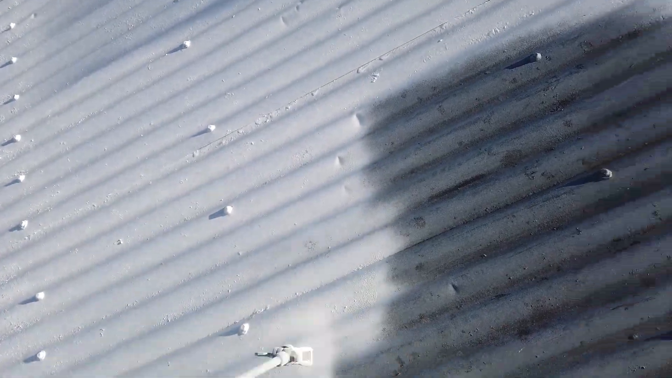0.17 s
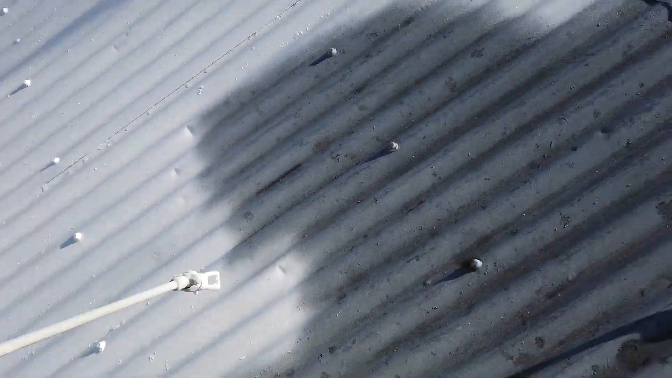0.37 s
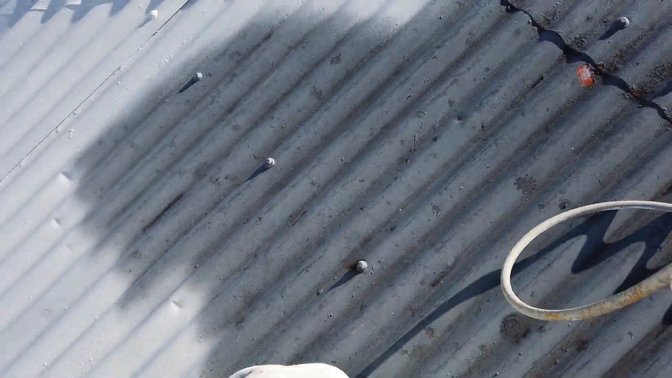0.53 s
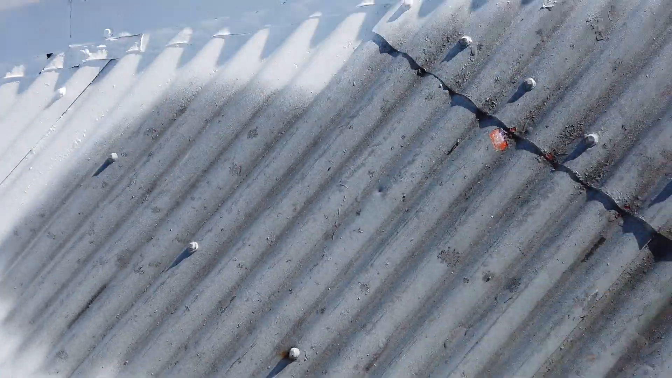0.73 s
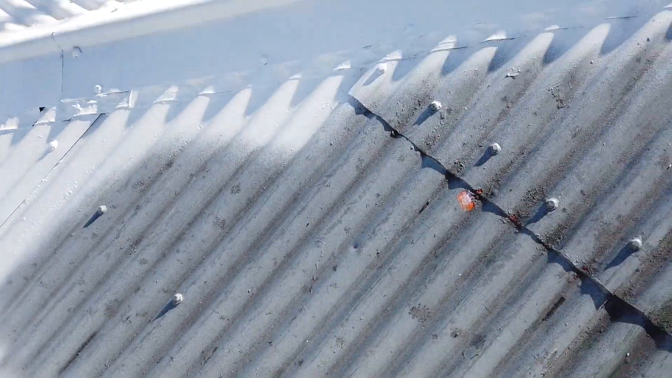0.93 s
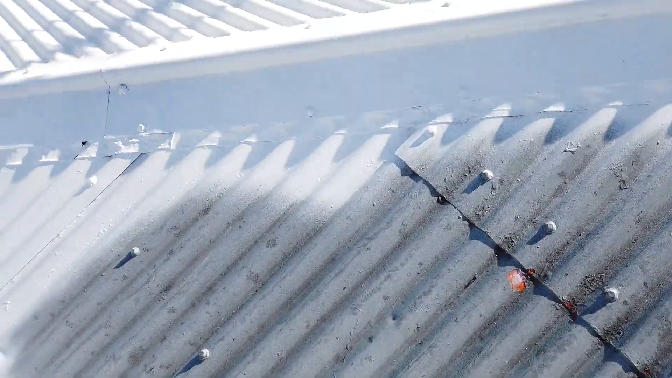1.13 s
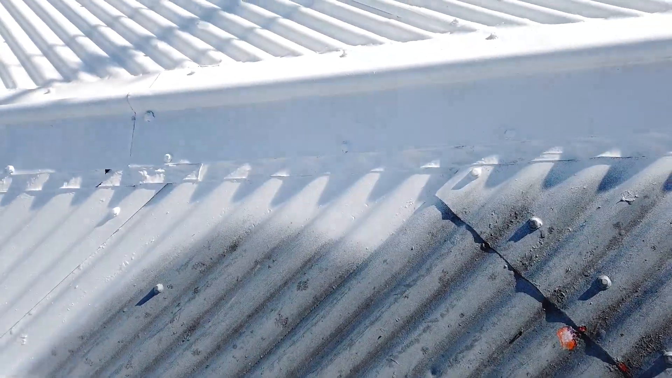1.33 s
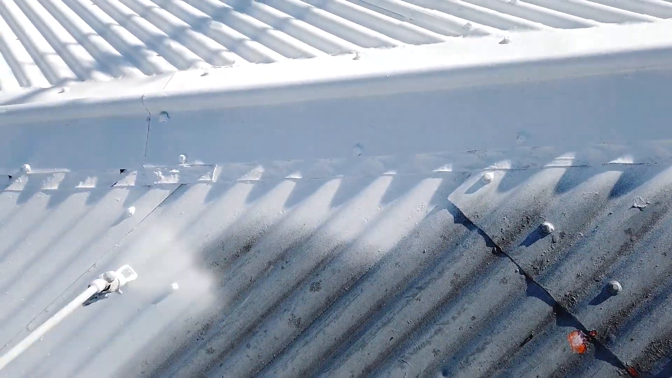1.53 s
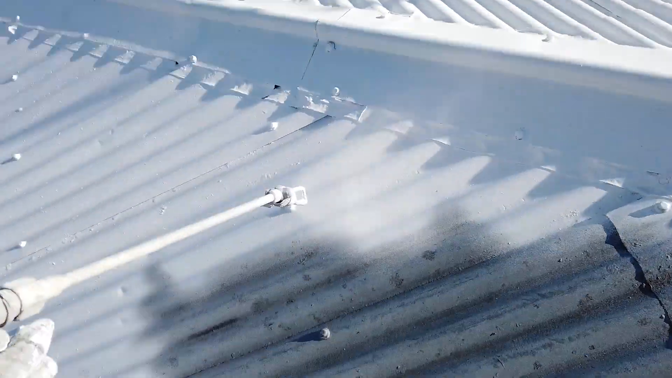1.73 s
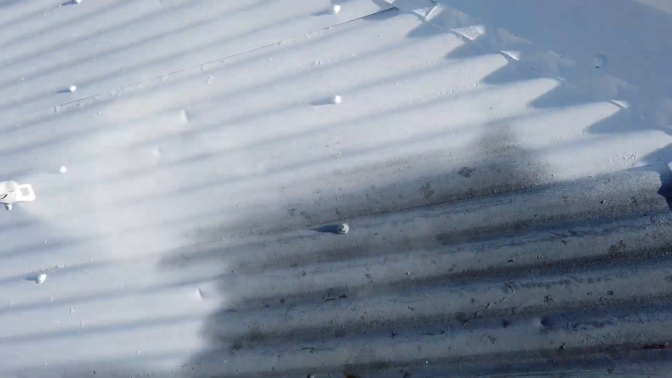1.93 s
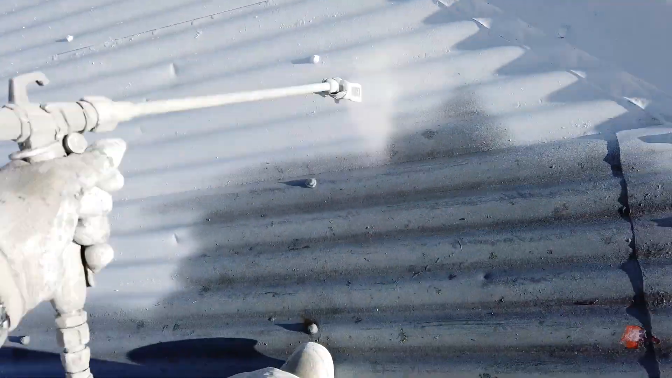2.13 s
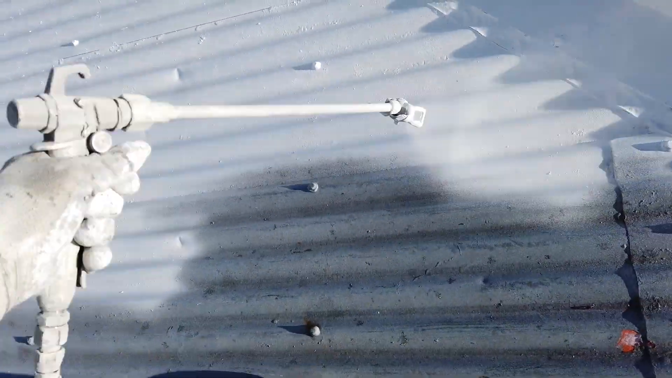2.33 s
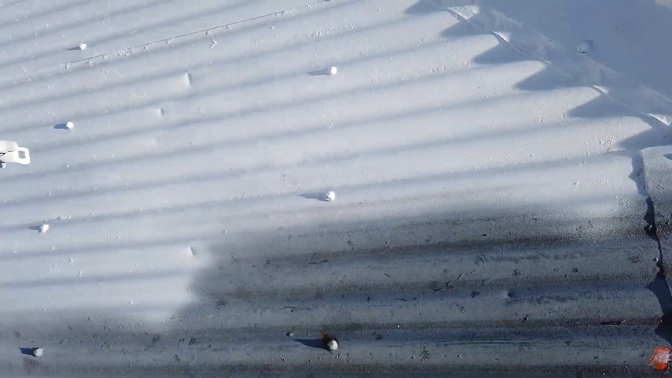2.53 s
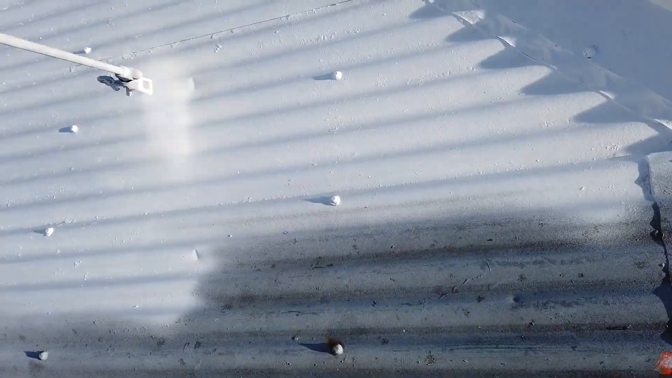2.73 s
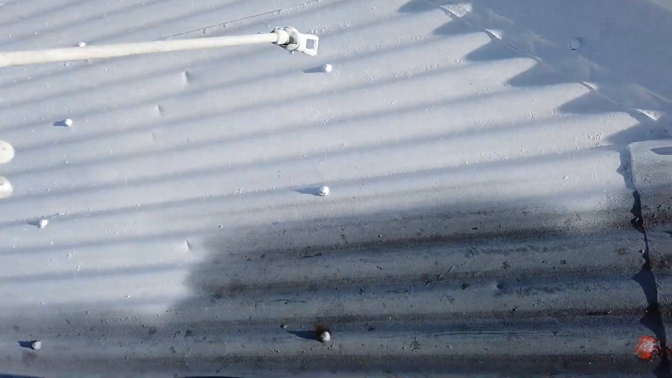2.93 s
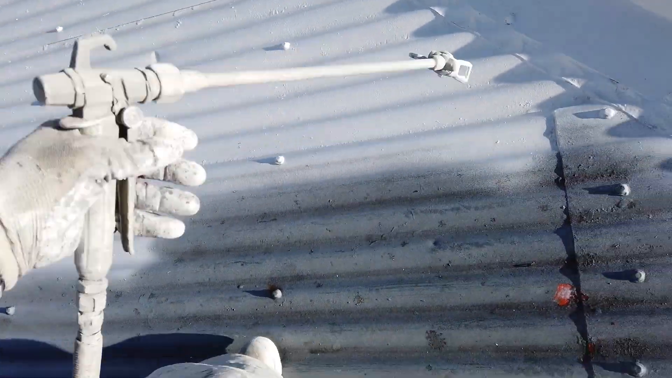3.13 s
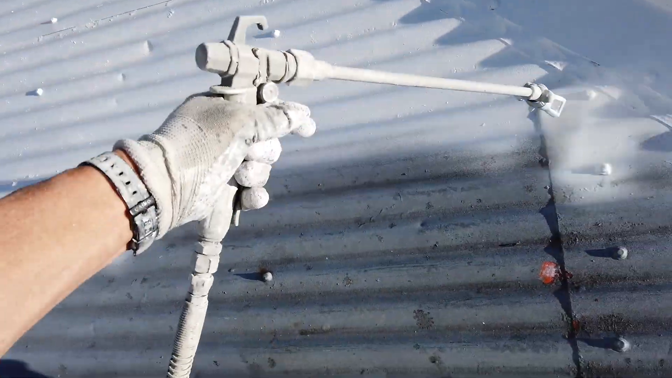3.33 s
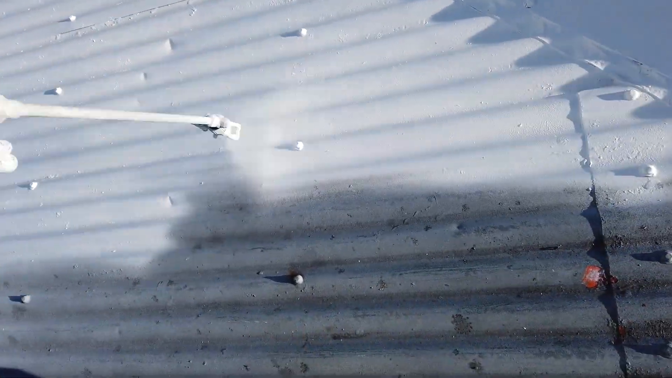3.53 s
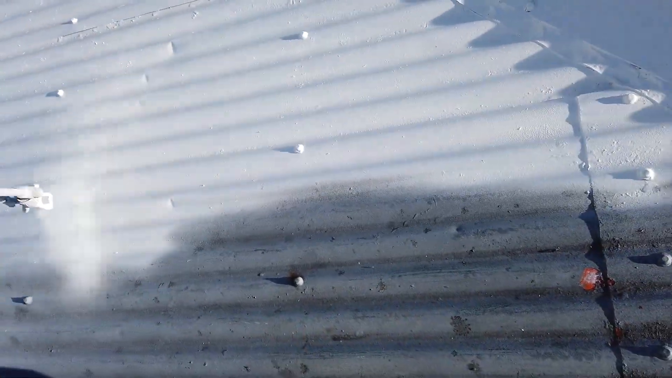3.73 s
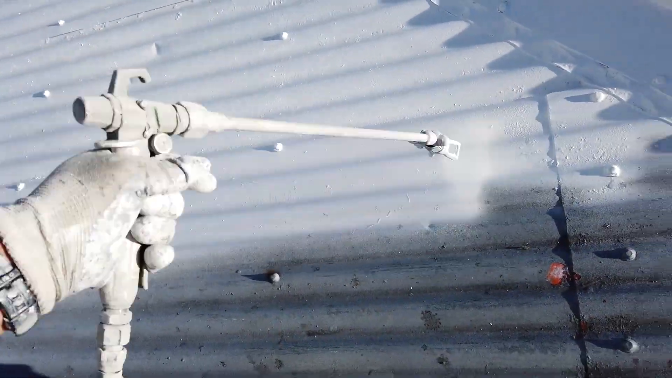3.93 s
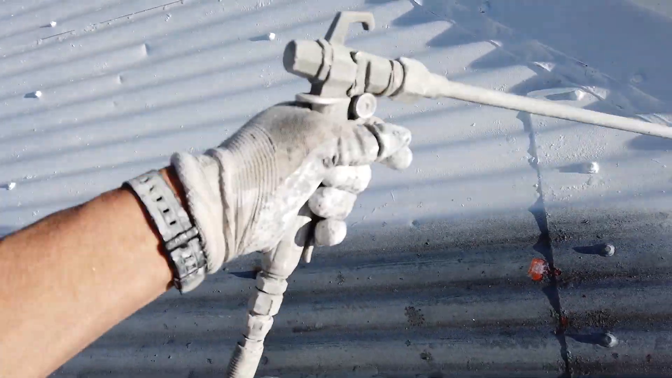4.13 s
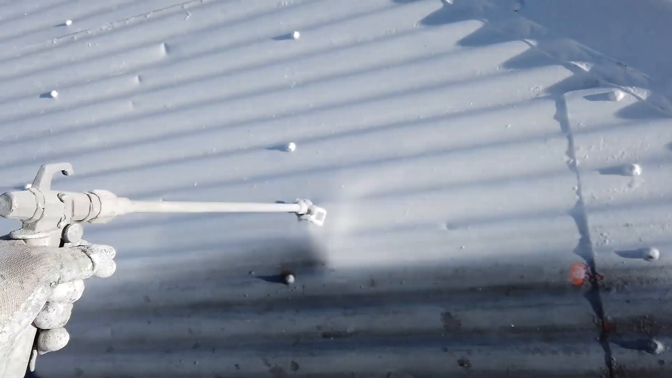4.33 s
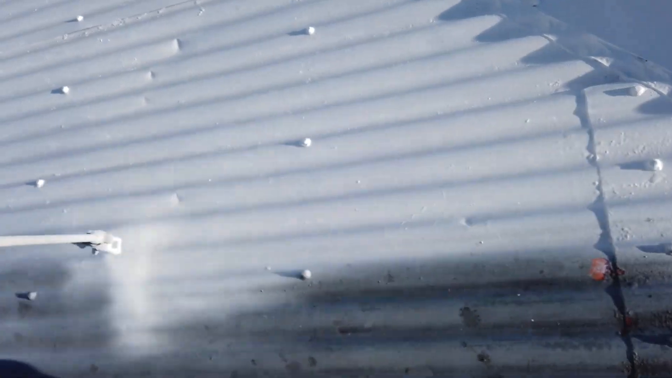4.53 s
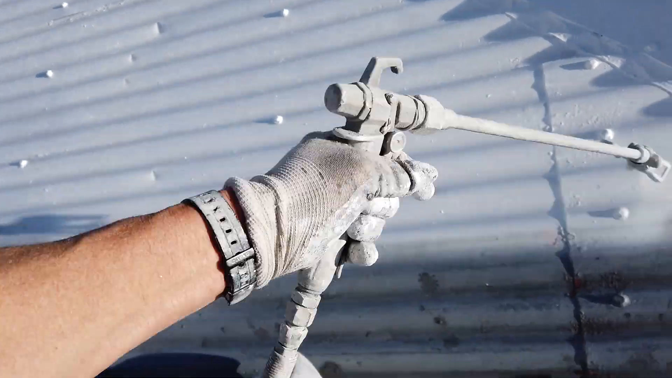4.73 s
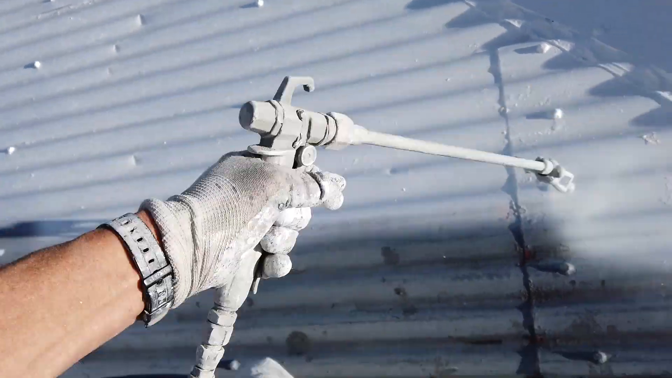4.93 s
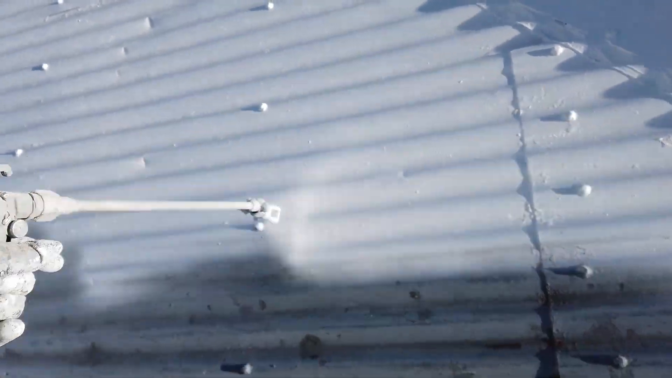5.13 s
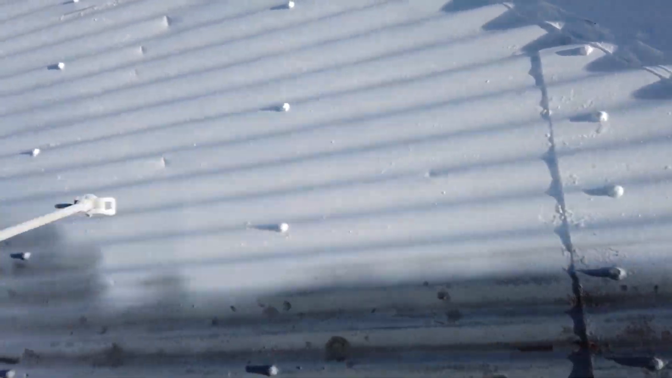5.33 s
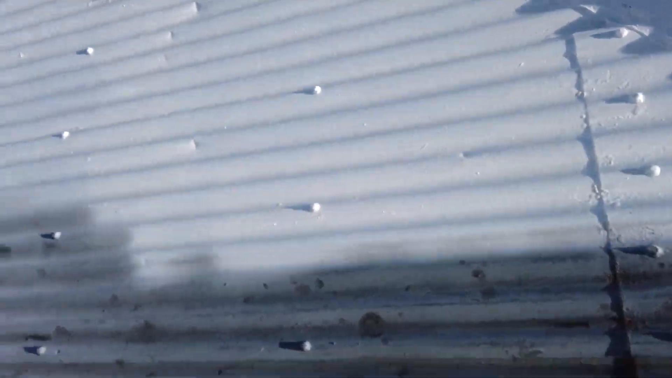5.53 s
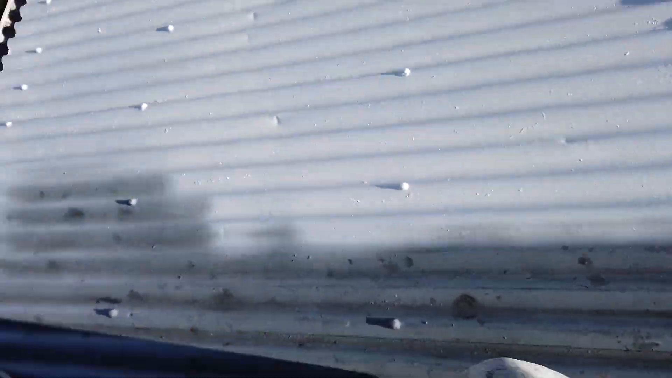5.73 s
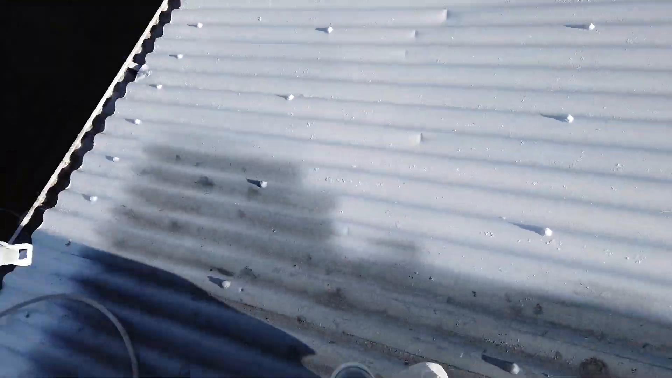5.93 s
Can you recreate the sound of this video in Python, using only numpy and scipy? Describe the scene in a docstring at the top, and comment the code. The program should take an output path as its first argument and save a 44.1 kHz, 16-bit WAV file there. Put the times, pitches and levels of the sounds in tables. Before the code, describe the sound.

A close stereo microphone outdoors catches a paint sprayer on a corrugated metal roof. From 0 seconds a bright, dense hiss with a softer rush is already running, stopping sharply near 0.36. Quiet air and light cloth and hose rustle follow from about 0.5. At 0.93 a shoe snaps the sheet and scrapes over grit; another scuff and firmer landing around 1.2 give a short, dull metallic ring and low thud. Spray returns from 1.47 to 2.59, shifting in level and brightness, then in a brief puff from 2.79 to 2.95. A tiny tick comes near 3.25. The longest burst runs from 3.38 to 5.39, with sputtering texture and small wind bumps. Barely audible hums and thin whines waver beneath. After spraying ends, gusts build; from 5.7 heavy low buffeting, raspy flaps and hollow pops hit hard, easing after 5.9 with a faint, fuzzy whistle.

```python
"""A paint spray hisses from the first instant, in four bursts onto a corrugated metal roof.
Tip hiss and the rush of the fan are shaped noise; their level and colour change as the wand sweeps.
Between bursts cloth and hose rustle, and a shoe scuffs, lands and rings the sheet's damped modes.
Faint tones waver beneath. Wind noise buffets each microphone, hardest at the end, with pops and a whistle."""
import sys
import numpy as np
from scipy import signal
from scipy.fft import rfft, irfft
from scipy.io import wavfile
from scipy.ndimage import uniform_filter1d

SR = 44100
rng = np.random.default_rng(int(sys.argv[2]) if len(sys.argv) > 2 else 0)


def wrap_up_sound(samples):
    """Save the sound to the file named by the first command line argument, as 16-bit audio."""
    columns = np.atleast_2d(samples).T
    # keep every value between -1 and 1, then stretch to whole-number steps
    tamed = np.clip(columns, -1, 1)
    steps = np.round(tamed * 32767).astype(np.int16)
    wavfile.write(sys.argv[1], SR, steps)


N = 268128
T = np.arange(N) / SR
# short-time grid of the spray: 512-sample windows, 128-sample hop
WINDOW, HOP = 512, 128
BINS = np.fft.rfftfreq(WINDOW, 1 / SR)
FRAMES = np.arange(N // HOP + 5) * HOP / SR


def amp(db):
    """Decibels to gain."""
    return 10 ** (np.asarray(db) / 20)


def unit(x):
    """Scales to rms 1."""
    return x / np.sqrt(np.mean(x ** 2) + 1e-20)


def read(points, hz):
    """Interpolates a spectrum table on a log-frequency axis."""
    f, value = np.transpose(points)
    return np.interp(np.log(hz + 1), np.log(f), value)


def follow(rows, t):
    """Interpolates each column of a curve table at the times t."""
    s, *columns = np.transpose(rows)
    return [np.interp(t, s, c) for c in columns]


def noise(spectrum, alike=0.0):
    """Two channels of coloured noise, rms 1, that share the fraction alike of their power."""
    z = rng.standard_normal((3, N))
    share = np.clip(alike, 0, 1)
    pair = np.sqrt(1 - share) * z[:2] + np.sqrt(share) * z[2]
    gain = amp(read(spectrum, np.fft.rfftfreq(N, 1 / SR)))
    return unit(irfft(rfft(pair) * gain, N))


def wander(rate_hz):
    """Smooth random signal of rms 1 for each channel, low-passed at rate_hz."""
    hz = np.fft.rfftfreq(N, 1 / SR)
    lowpass = 1 / (1 + (hz / rate_hz) ** 4)
    return unit(irfft(rfft(rng.standard_normal((2, N))) * lowpass, N))


def hump(hz, width_hz):
    """A bell of height 1 over frequency."""
    return np.exp(-((BINS - hz) / width_hz) ** 2 / 2)


def port_turns(count, spread_turns=0.45):
    """A random phase in turns for each vibration, a little apart at the two microphones."""
    z = rng.random((count, 3, 1))
    return z[:, :1] + spread_turns * z[:, 1:]


def ring(modes, hz=None):
    """A soft blow on damped modes, peak 1; hz retunes the first mode and scales the rest alike."""
    contact_s = 0.0018
    t = T[:SR // 4]
    turns = port_turns(count=len(modes))
    stretch = hz / modes[0][0] if hz else 1
    waves = 0
    for (f, db, t60_s), p in zip(modes, turns):
        decay = amp(db - 60 * t / t60_s)
        waves = waves + decay * np.sin(2 * np.pi * (stretch * f * t + p))
    waves = waves * (1 - np.exp(-(t / contact_s) ** 2))
    return waves / abs(waves).max(axis=1, keepdims=True)


def add(mix, s, sound):
    """Mixes a sound in at time s, cut at the end of the mix."""
    part = mix[:, round(s * SR):][:, :sound.shape[1]]
    part += sound[:, :part.shape[1]]


def valve(close_db_per_s=2100):
    """The needle valve snaps open; on release the jet dies within a few hundredths of a second."""
    open_s = 0.0022
    # Each row is a trigger pull: valve opens in seconds, starts to close in seconds.
    trigger = [(-0.05, 0.36), (1.472, 2.593), (2.787, 2.953), (3.376, 5.394)]
    gain = 0
    for on, off in trigger:
        opening = (1 + np.tanh((T - on) / open_s)) / 2
        gain = gain + opening * amp(-close_db_per_s * np.maximum(T - off, 0))
    return gain


def patches():
    """Bright and dull spots in dB that drift through the hiss, plus a fixed ripple over frequency."""
    drift_db, ripple_db = 1.6, 0.6
    z = rng.standard_normal((len(FRAMES), len(BINS)))
    for _ in range(2):
        z = uniform_filter1d(z, size=19, axis=0)
        z = uniform_filter1d(z, size=5, axis=1)
    return drift_db * unit(z) + ripple_db * rng.standard_normal(len(BINS))


def spray(peak_width_hz=850):
    """Paint tears into mist at the tip and the fan rushes on the sheet; both vary as the wand sweeps."""
    # Wand sweep, one table a burst. Each row: time in seconds, tip hiss in dB, fan rush in dB.
    sweeps = [
        [(0.0, -34, -47), (0.058, -38, -46.5), (0.262, -29.5, -44.5), (0.304, -29, -41.5), (0.355, -27.5, -45)],
        [(1.485, -29, -43), (1.687, -30, -44), (1.741, -29, -44), (1.785, -28.5, -39.5), (1.861, -28, -43.5),
         (2.049, -34, -43.5), (2.073, -32, -46), (2.267, -28, -41), (2.383, -30, -45), (2.417, -27, -41.5),
         (2.493, -28, -45), (2.588, -33, -42.5)],
        [(2.8, -34.5, -43.5), (2.854, -27.5, -42.5), (2.948, -29.5, -44)],
        [(3.39, -28, -41), (3.434, -24.5, -39.5), (3.488, -27, -41), (3.61, -29, -43.5), (3.816, -36.5, -47.5),
         (3.854, -34, -44.5), (3.922, -31.5, -46.5), (3.932, -27, -43), (4.066, -27.5, -40.5),
         (4.126, -30, -43.5), (4.176, -29.5, -41), (4.292, -28, -43), (4.326, -27, -40.5), (4.57, -34.5, -47.5),
         (4.652, -32.5, -44), (4.73, -26.5, -45.5), (4.814, -29.5, -42), (4.874, -28, -44), (4.952, -30, -42),
         (4.974, -27.5, -40.5), (5.224, -31, -45), (5.38, -31.5, -45)],
    ]
    # Brightest part of the hiss. Each row: time in seconds, peak height in dB, its pitch in Hz.
    beam = [(0.0, 1, 11700), (0.12, 5, 11400), (0.29, -1, 11350), (0.35, 3.5, 11400), (1.5, 4, 11500),
            (1.62, -0.5, 10600), (1.75, 4, 11000), (1.9, 4.5, 11700), (1.97, 1, 10800), (2.07, 5, 11800),
            (2.2, 3, 11900), (2.29, 3.5, 10700), (2.38, 4, 12100), (2.46, 2.5, 10900), (2.585, 2, 11500),
            (2.8, 4.5, 11100), (2.92, 4.5, 10900), (3.39, -2, 12100), (3.46, 8, 11800), (3.53, 0, 10870),
            (3.6, 4.5, 10400), (3.68, 2, 11800), (3.8, 3, 11400), (3.89, 0, 12400), (3.945, 2, 12000),
            (4.0, 7, 11000), (4.08, 9, 11000), (4.14, -1, 11500), (4.21, 4, 13000), (4.33, 3, 12900),
            (4.46, 1.5, 11600), (4.53, 0.5, 10200), (4.63, 1, 10100), (4.69, 5, 10400), (4.745, 8, 10000),
            (4.82, -1, 10300), (5.0, 3.5, 11000), (5.12, 2, 10800), (5.22, 4, 10100), (5.385, 3, 10700)]
    # Colour as the fan turns. Each row: time in seconds, lower shoulder in dB, top treble in dB.
    colour_curve = [(0.1, 2, -1), (0.33, 1.5, -0.5), (1.52, 0, 3), (1.65, -3, -1.5), (1.8, 2.5, -1),
                    (1.95, 2.5, -4), (2.1, 3, -5), (2.2, 6, -1), (2.3, 1, -0.5), (2.55, 1.5, 1),
                    (2.9, 0.5, 1.5), (3.4, 0.5, -5), (3.58, -5, -2), (3.72, -4, -4), (3.83, 1, -0.5),
                    (4.02, -1, -3), (4.22, 0.5, 1.5), (4.34, 4, 0.5), (4.43, 1, -2), (4.58, -0.5, 0.5),
                    (4.74, 0, 2.5), (4.88, -2.5, -2.5), (5.03, 1, 0.5), (5.25, 1, 5), (5.38, 0.5, 0)]
    # Spectra of tip hiss and fan rush. Each row: frequency in Hz, relative density in dB.
    tip_spectrum = [(4500, -38), (6300, -21.5), (7200, -9), (8400, -5), (9200, -6.5), (10400, -3.5),
                    (11400, -2.5), (12600, -2.5), (14000, -6), (15700, -10)]
    fan_spectrum = [(300, -19), (1200, -22.5), (1700, -15.5), (2300, -8.5), (3200, -4.5), (4300, -3.5),
                    (5200, 1), (6000, 0.5), (6800, 1.5), (7700, -4), (11000, -16.5)]
    shoulder_hz, top_hz = 7910, 14850
    flutter_db, flutter_hz, sputter_db, sputter_hz = 0.3, 70, 0.95, 280

    hiss_db, rush_db = (c[:, None] for c in follow(np.vstack(sweeps), FRAMES))
    peak_db, bright_hz = (c[:, None] for c in follow(beam, FRAMES))
    shoulder_db, top_db = (c[:, None] for c in follow(colour_curve, FRAMES))
    # the jet beams its treble, so the brightest pitch moves as the wand turns
    beam_db = peak_db * hump(bright_hz, peak_width_hz)
    beam_db = beam_db + shoulder_db * hump(shoulder_hz, width_hz=600) + top_db * hump(top_hz, width_hz=1400)
    tip = amp(read(tip_spectrum, BINS) + beam_db)
    # colour alone must not change the level
    tip = tip / np.sqrt(np.mean(tip ** 2, axis=1, keepdims=True)) * amp(hiss_db)
    fan = unit(amp(read(fan_spectrum, BINS))) * amp(rush_db)
    colour = np.hypot(tip, fan) * amp(patches())

    white = np.sqrt(2) * rng.standard_normal((2, N + 1024))
    z = signal.stft(white, nperseg=WINDOW, noverlap=WINDOW - HOP)[2][:, :, :len(FRAMES)]
    hiss = signal.istft(z * colour.T, nperseg=WINDOW, noverlap=WINDOW - HOP)[1][:, :N]
    flutter = flutter_db * wander(rate_hz=flutter_hz)[0]
    sputter = sputter_db * wander(rate_hz=sputter_hz)[0]
    return hiss * amp(flutter + sputter) * valve()


def air():
    """Quiet of the open air: coloured noise, nearly independent at each microphone, wandering slowly."""
    # Each row: frequency in Hz, relative density in dB.
    outdoors = [(15, -15), (40, 1.5), (90, -11.5), (260, -11), (550, -27), (1000, -27.5), (2000, -29),
                (3200, -35.5), (5000, -41.5), (6800, -51), (8300, -44.5), (9200, -51.5), (12500, -45),
                (15500, -78.5)]
    return amp(-53.5) * noise(outdoors, alike=0.02) * amp(1.0 * wander(rate_hz=4.2)[0])


def wind_strength():
    """Buffeting and fast-eddy levels in dB: over the breeze each gust rises fast, holds and dies away."""
    # Breeze between gusts. Each row: time in seconds, level in dB.
    breeze = [(0.4, -56), (0.9, -43), (1.35, -49), (1.65, -57.5), (3.2, -57.5), (4.1, -64.5), (5.0, -51),
              (5.65, -47.5)]
    # Each row: start in seconds, hold in seconds, low buffeting in dB, fast eddies in dB.
    gusts = [(0.162, 0.028, -44, -55), (2.343, 0.03, -45, -76), (3.3, 0.079, -45.5, -64.5),
             (3.397, 0.056, -38.5, -48.5), (3.467, 0.013, -52, -46), (3.524, 0.043, -40, -49.5),
             (3.622, 0.086, -47.5, -60), (4.246, 0.073, -40, -49.5), (4.349, 0.14, -39.5, -54.5),
             (4.788, 0.1, -35.5, -50.5), (4.821, 0.025, -49, -39), (4.941, 0.0075, -34, -54),
             (5.063, 0.053, -34.5, -56), (5.255, 0.047, -46.5, -54), (5.4, 0.043, -39, -74.5),
             (5.544, 0.024, -34.5, -50.5), (5.694, 0.033, -33, -43.5), (5.738, 0.013, -21.5, -30),
             (5.757, 0.066, -20.5, -39), (5.775, 0.014, -25.5, -29.5), (5.815, 0.011, -19.5, -22.5),
             (5.838, 0.035, -17.5, -28), (5.868, 0.011, -23.5, -21.5), (5.891, 0.016, -18.5, -28.5),
             (5.943, 0.15, -28, -49.5)]
    rise_s, buffet_fall_db_per_s, eddy_fall_db_per_s = 0.004, 336.5, 618
    breeze_eddy_db = -10  # relative to the breeze
    breeze_db = follow(breeze, T)[0]
    buffet, eddies = amp(breeze_db), amp(breeze_db + breeze_eddy_db)
    for s, hold_s, buffet_db, eddy_db in gusts:
        rise = (1 + np.tanh((T - s) / rise_s)) / 2
        past_s = np.maximum(T - s - hold_s, 0)
        buffet = np.hypot(buffet, rise * amp(buffet_db - buffet_fall_db_per_s * past_s))
        eddies = np.hypot(eddies, rise * amp(eddy_db - eddy_fall_db_per_s * past_s))
    return 20 * np.log10([buffet, eddies])


def wind(lumpy_db=1.5, burst_db=4.0, rasp_growth=1.13, rasp_db=-3.5):
    """Eddies push on each microphone apart; the fast ones come in short bursts and rasp when strong."""
    # Spectra of buffeting, fast eddies and rasp. Each row: frequency in Hz, relative density in dB.
    buffet_spectrum = [(15, -13.5), (32, 7), (58, 0.5), (110, -1.5), (195, -5.5), (280, -11.5), (500, -34),
                       (1000, -55), (3000, -74.5)]
    eddy_spectrum = [(60, -11.5), (200, -1), (440, 0.5), (620, -5), (900, -18.5), (1500, -26.5),
                     (3000, -58), (6000, -87)]
    rasp_spectrum = [(300, -14), (700, 5.5), (1200, 2.5), (1650, -5), (2400, -14), (3200, -29.5),
                     (4500, -41.5), (7000, -61)]
    churn_hz = 120
    buffet_db, eddy_db = wind_strength()
    lumps = wander(rate_hz=churn_hz)
    bursts = amp(burst_db * lumps)
    low = unit(noise(buffet_spectrum, alike=0.15) * amp(lumpy_db * lumps)) * amp(buffet_db)
    eddies = unit(noise(eddy_spectrum, alike=0.07) * bursts) * amp(eddy_db)
    rasp = unit(noise(rasp_spectrum, alike=0.11) * bursts) * amp(rasp_growth * eddy_db + rasp_db)
    return low + eddies + rasp


def rustles():
    """Sleeve and hose rub as the painter moves: soft swells of grainy noise."""
    # Each row: middle in seconds, length in seconds, level in dB.
    moves = [(0.558, 0.035, -57), (0.63, 0.069, -61.5), (0.713, 0.053, -67), (0.824, 0.12, -69),
             (0.991, 0.04, -54.5)]
    # Each row: frequency in Hz, relative density in dB.
    rub_spectrum = [(500, -22), (1600, 3), (4000, -5), (7000, -15), (11000, -6.5), (15500, -15)]
    grain_db = 2.0
    swell = sum(amp(db) * np.exp(-(2 * (T - s) / length_s) ** 2) for s, length_s, db in moves)
    return swell * noise(rub_spectrum) * amp(grain_db * wander(rate_hz=200))


def steps(spread_db=-4, spread_t60_s=0.21):
    """The sole scrapes over grit; the sheet rings dully, flexes and snaps; faint ticks come late."""
    # Scrapes. Each row: start in seconds, hold in seconds, level in dB.
    scuffs = [(0.929, 0.017, -35.5), (0.957, 0.017, -36), (0.984, 0.018, -43.5), (1.003, 0.0071, -40.5),
              (1.032, 0.0079, -45.5), (1.05, 0.063, -59.5), (1.172, 0.02, -35), (1.202, 0.022, -48)]
    # Each row: time in seconds, sheet ring in dB, its pitch in Hz, low thud in dB.
    footfalls = [(0.982, -30.5, 524, -37), (1.005, -31, 330, -24), (1.042, -34, 326, -40),
                 (1.103, -41, 285, -29.5), (1.174, -28.5, 660, -48.5), (1.18, -35, 784, -48),
                 (1.187, -28, 457, -27), (1.203, -20.5, 407, -28), (1.215, -34, 340, -22),
                 (1.231, -37, 326, -32), (1.246, -44, 299, -39), (3.028, -45.5, 270, -37)]
    # Snaps of the sheet under the shoe, and faint late ticks, perhaps the trigger.
    # Each row: time in seconds, main pitch in Hz, level in dB.
    snaps = [(0.9277, 1547, -20.5), (0.961, 1960, -35.5), (0.972, 2140, -38), (0.983, 1130, -38),
             (1.009, 1610, -32.5), (1.036, 1290, -43), (1.175, 1380, -35), (1.182, 1640, -34.5),
             (1.206, 1290, -41), (1.218, 1405, -44), (2.99, 2280, -62), (3.247, 2300, -55.5)]
    # Modes of shoe-damped sheet, flexing roof and snap. Each row: pitch in Hz, relative dB, t60 in seconds.
    sheet_modes = [(416, 14.5, 0.026), (319, 3.5, 0.077), (513, 4, 0.035), (650, -7, 0.037),
                   (910, -13, 0.055), (1080, -10.5, 0.066)]
    flex_modes = [(60, 2, 0.072), (106.3, 0, 0.044), (137, -1.5, 0.03)]
    snap_modes = [(1548, 7, 0.026), (738, -19, 0.05), (1140, -10.5, 0.05), (2060, -9.5, 0.034),
                  (2700, -14.5, 0.04), (3060, -13, 0.03), (3485, -14, 0.036), (3850, -17, 0.03),
                  (5000, -12, 0.014), (6000, -7.5, 0.016), (6730, -16, 0.012), (8400, -17, 0.012)]
    # Each row: frequency in Hz, relative density in dB.
    scrape_spectrum = [(200, 4), (600, 9), (1100, 2.5), (1600, 2.5), (2300, -1), (3200, -10), (4500, -19.5),
                       (6000, -24), (9000, -32), (15000, -38)]
    scuff_rise_s, scuff_fall_db_per_s = 0.0027, 850
    grit_db, grit_hz = 2.5, 600

    out, pressure = np.zeros((2, N)), np.zeros(N)
    for s, hold_s, scrape_db in scuffs:
        age_s = np.maximum(T - s, 0)
        fall_db = scuff_fall_db_per_s * np.maximum(age_s - hold_s, 0)
        pressure += (1 - np.exp(-age_s / scuff_rise_s)) * amp(scrape_db - fall_db)
    for s, ring_db, hz, thud_db in footfalls:
        add(out, s, amp(ring_db) * ring(sheet_modes, hz) + amp(thud_db) * ring(flex_modes))
    for s, hz, db in snaps:
        add(out, s, amp(db) * ring(snap_modes, hz))
    grit = amp(grit_db * wander(rate_hz=grit_hz))
    out = out + pressure * unit(noise(scrape_spectrum, alike=0.25) * grit)
    # these sounds spread through the rest of the roof and die there, dull
    tail = noise([(100, -9), (450, -6.5), (1500, -6.5), (4000, -25.5)]) * amp(-60 * T / spread_t60_s)
    tail = tail[:, :SR // 2]
    tail = tail / abs(rfft(tail)).max()
    return out + amp(spread_db) * signal.oaconvolve(out, tail, axes=1)[:, :N]


def hum(fade_s=0.22, waver_hz=1.2):
    """Faint, wavering sines, probably the pump: low hums while paint flows, thin whines around pauses."""
    # Each row: start in seconds, end in seconds, pitch in Hz, level in dB before the fades.
    tones = [(1.4, 2.62, 230, -58.5), (2.546, 2.9, 2140, -75.5), (2.96, 3.3, 2165, -73),
             (3.596, 4.3, 226.7, -63)]
    waver = waver_hz * wander(rate_hz=6.3)[0]
    out = 0
    for on, off, hz, db in tones:
        fade = np.clip(np.minimum(T - on, off - T) / fade_s, 0, 1)
        out = out + amp(db) * fade * np.sin(2 * np.pi * np.cumsum(hz + waver) / SR)
    return out


def thumps(length_s=0.0028):
    """A hard eddy hits the microphone ports: a brief, hollow pop, a sine under a bell-shaped swell."""
    # Each row: middle in seconds, pitch in Hz, peak level in dB.
    pops = [(3.548, 441, -36.5), (4.258, 297, -46), (4.299, 170.4, -40), (4.411, 199, -35.5),
            (4.45, 190.8, -37), (4.822, 555, -34), (4.844, 480, -36), (4.954, 378, -37.5),
            (5.11, 450, -38.5), (5.506, 739, -45.5), (5.565, 108.7, -29), (5.703, 450, -33.5),
            (5.783, 210, -23), (5.803, 200.3, -20.5), (5.822, 229.8, -16), (5.853, 189.6, -14),
            (5.876, 520, -17), (5.88, 648, -31), (5.912, 900, -23)]
    phases = 2 * np.pi * port_turns(count=len(pops))
    out = 0
    for (s, hz, db), phase in zip(pops, phases):
        swell = amp(db) * np.exp(-((T - s) / length_s) ** 2)
        out = out + swell * np.sin(2 * np.pi * hz * T + phase)
    return out


def whistle():
    """The closing gusts sing on an edge: a gliding tone made fuzzy, in a skirt of hiss."""
    # Each row: time in seconds, pitch in Hz, level in dB.
    glide = [(5.8, 2200, -75), (5.9, 2300, -59), (5.93, 2550, -55), (5.95, 2350, -54), (5.968, 2850, -57),
             (5.987, 2780, -53), (6.012, 2300, -55), (6.04, 2330, -57), (6.08, 2050, -61)]
    core_hz, skirt_hz, skirt_db = 170, 650, -3
    hz, db = follow(glide, T)
    fuzz = wander(rate_hz=core_hz) + amp(skirt_db) * wander(rate_hz=skirt_hz)
    tone = unit(fuzz * np.sin(2 * np.pi * np.cumsum(hz) / SR))
    return tone * amp(db) * (T > glide[0][0])


def scene():
    """All sources over the quiet of the open air."""
    return spray() + air() + wind() + rustles() + steps() + hum() + thumps() + whistle()


def record(dry):
    """The recorder's band limit: a linear-phase low-pass."""
    edge_hz = 15800
    lowpass = signal.firwin(801, edge_hz, window=("kaiser", 8), fs=SR)
    return signal.oaconvolve(dry, lowpass[None], "same")


dry = scene()
out = record(dry)
wrap_up_sound(out)
```